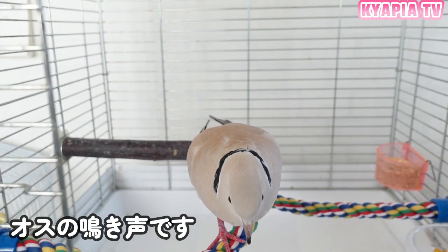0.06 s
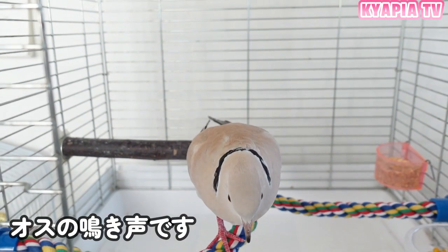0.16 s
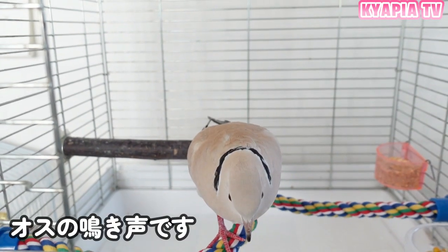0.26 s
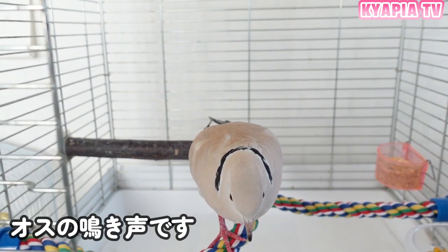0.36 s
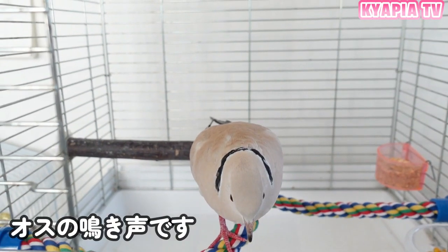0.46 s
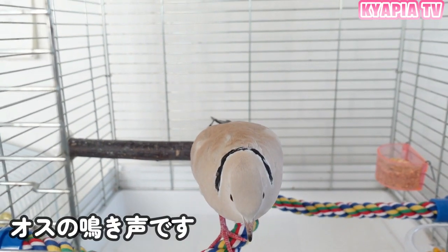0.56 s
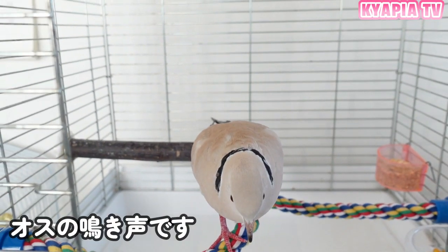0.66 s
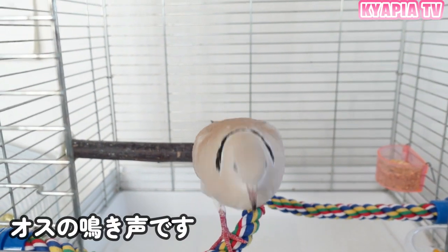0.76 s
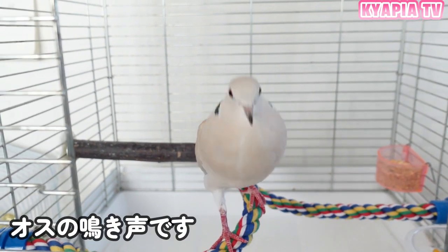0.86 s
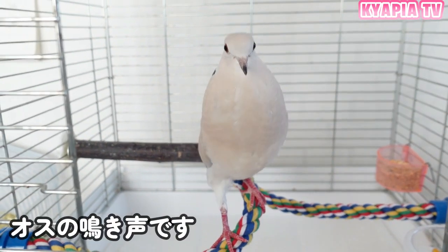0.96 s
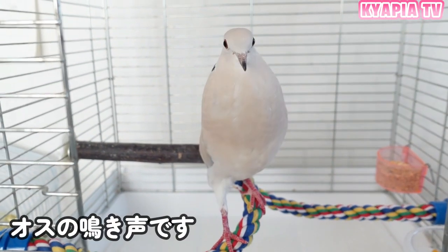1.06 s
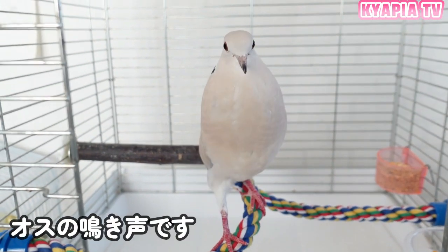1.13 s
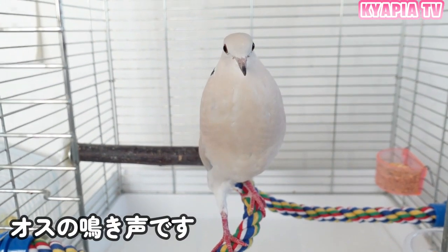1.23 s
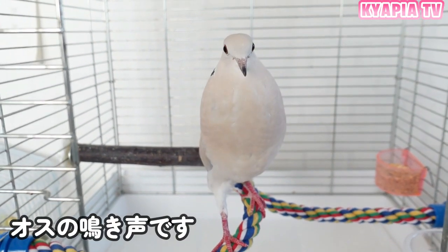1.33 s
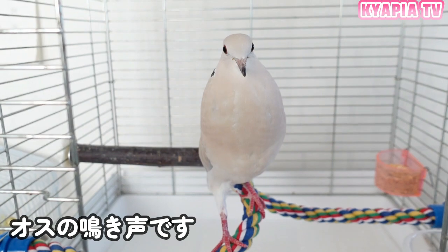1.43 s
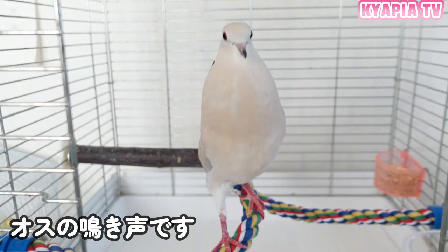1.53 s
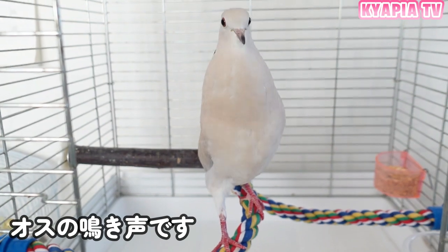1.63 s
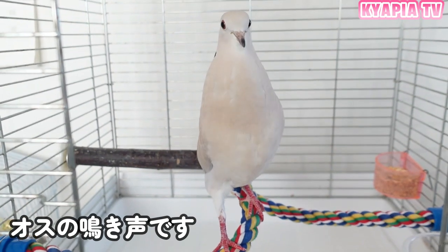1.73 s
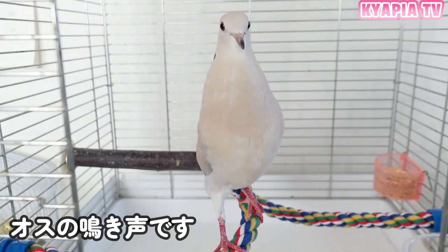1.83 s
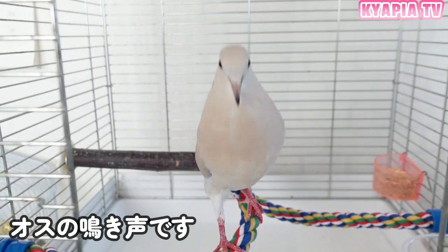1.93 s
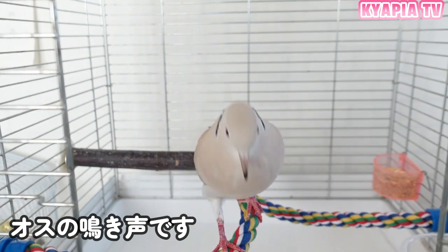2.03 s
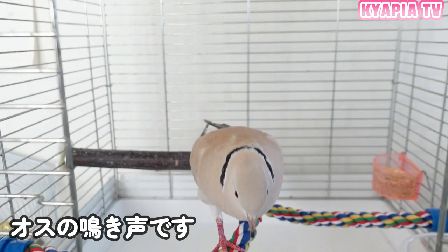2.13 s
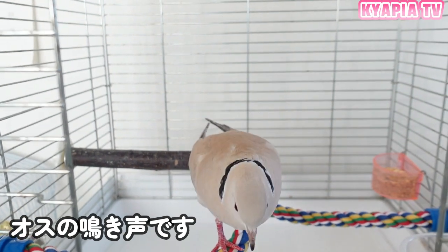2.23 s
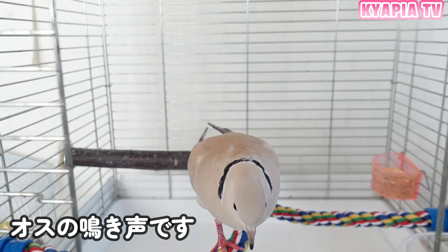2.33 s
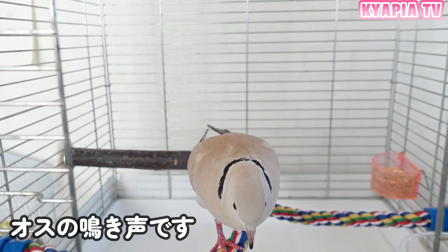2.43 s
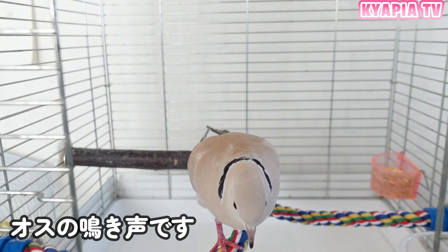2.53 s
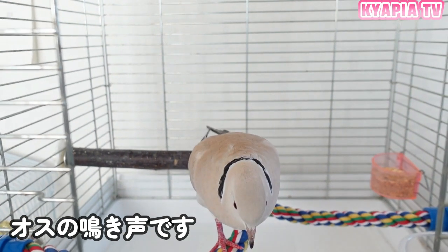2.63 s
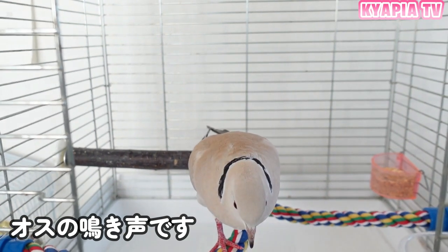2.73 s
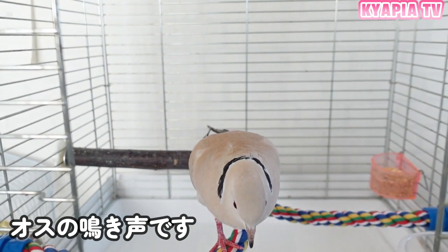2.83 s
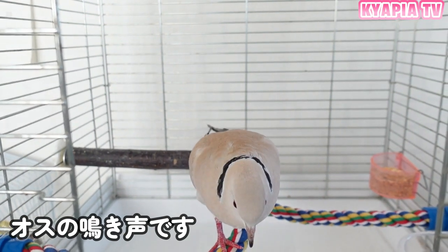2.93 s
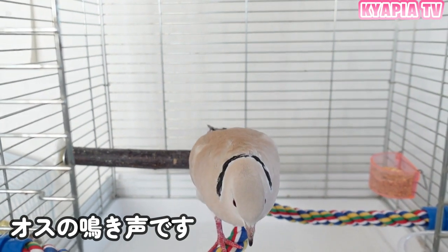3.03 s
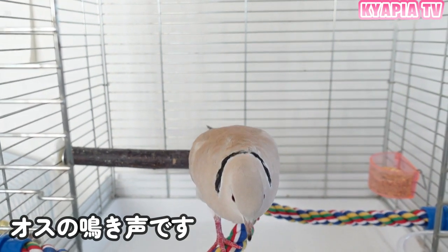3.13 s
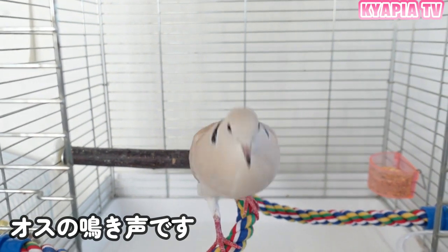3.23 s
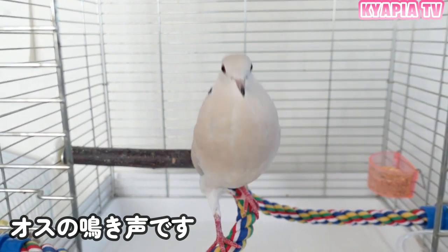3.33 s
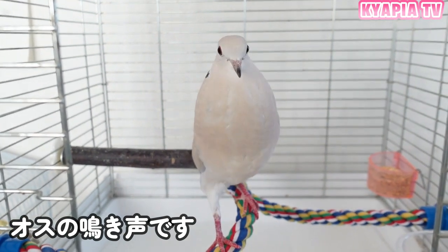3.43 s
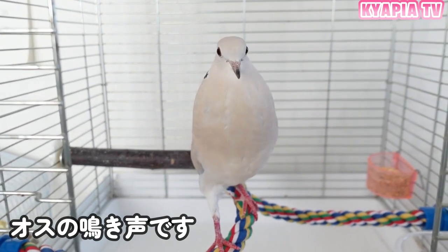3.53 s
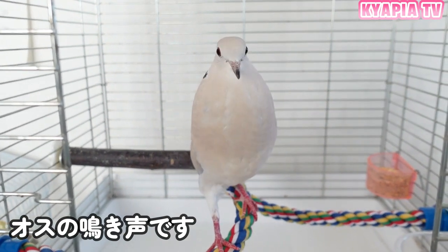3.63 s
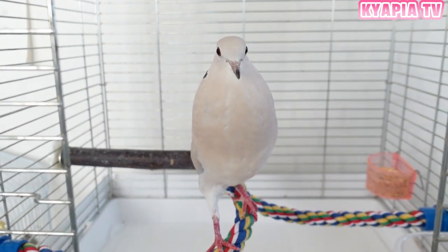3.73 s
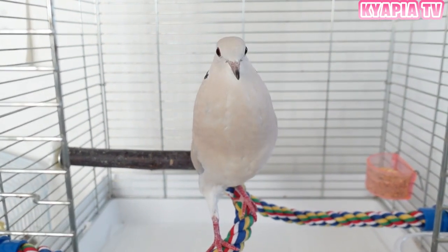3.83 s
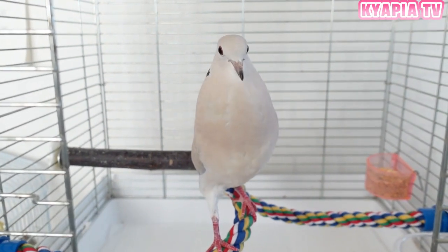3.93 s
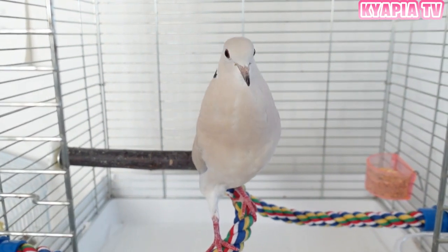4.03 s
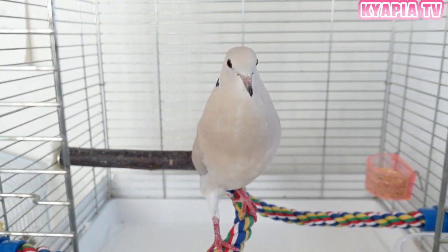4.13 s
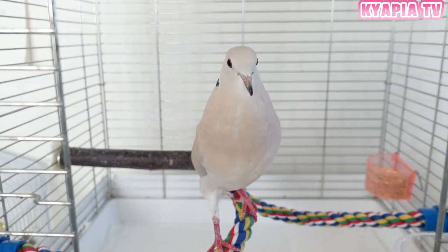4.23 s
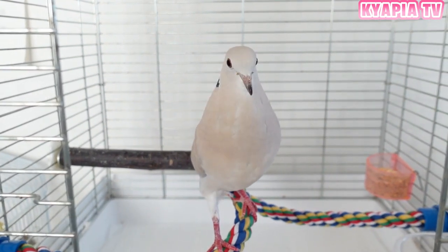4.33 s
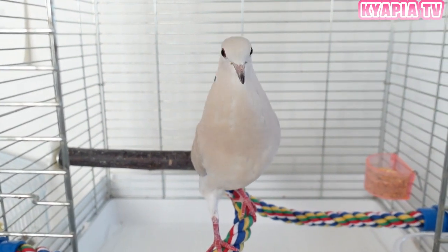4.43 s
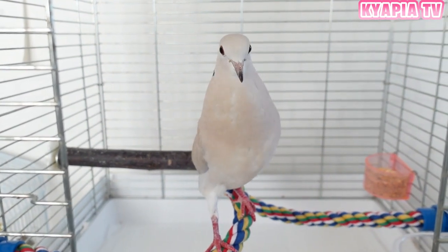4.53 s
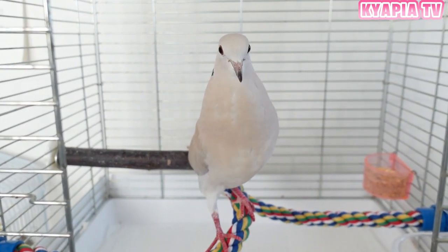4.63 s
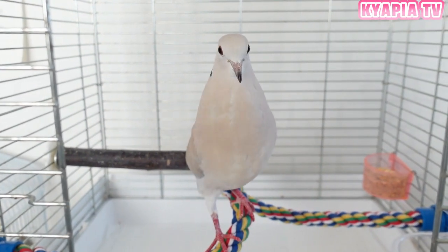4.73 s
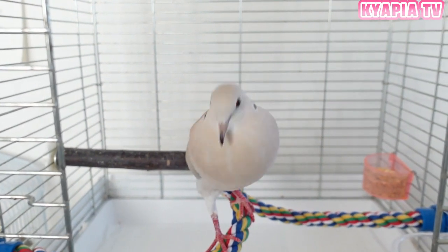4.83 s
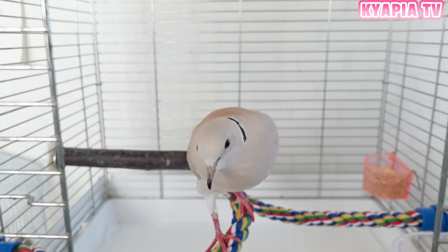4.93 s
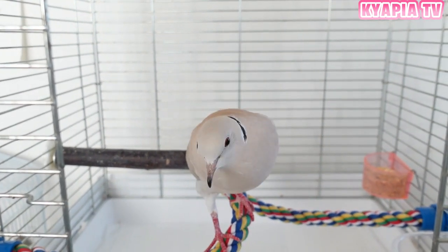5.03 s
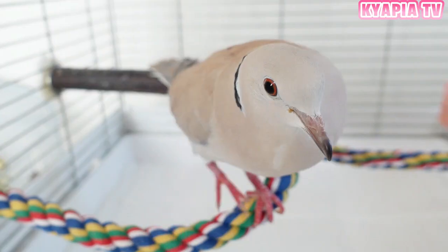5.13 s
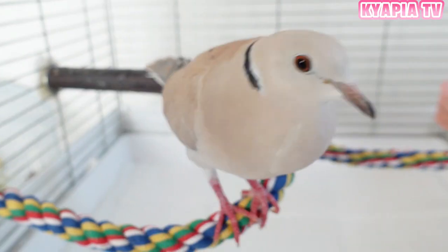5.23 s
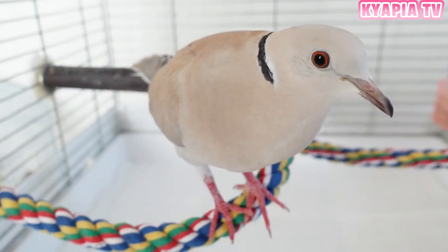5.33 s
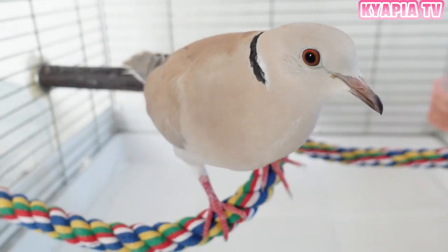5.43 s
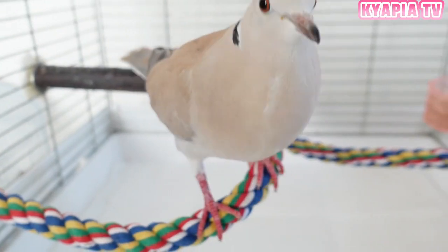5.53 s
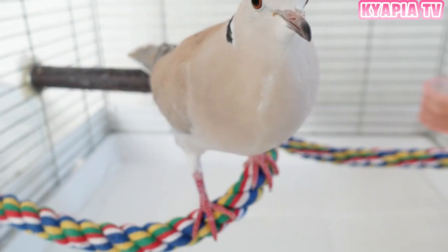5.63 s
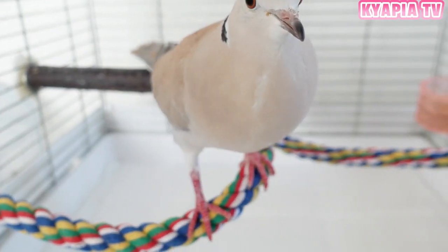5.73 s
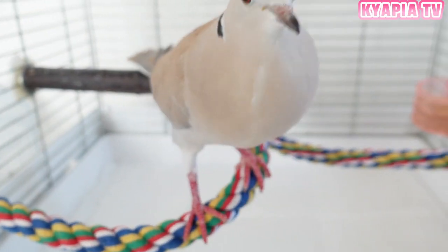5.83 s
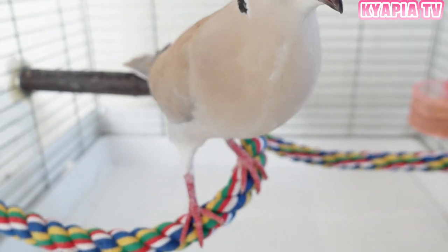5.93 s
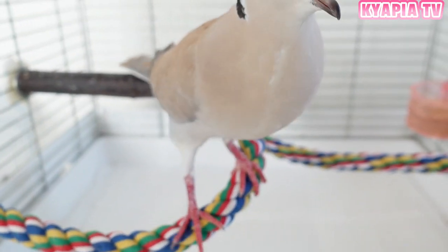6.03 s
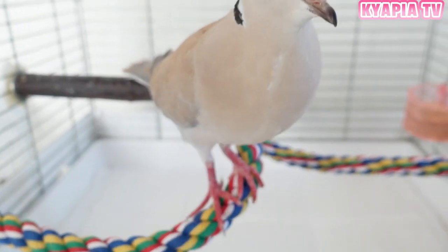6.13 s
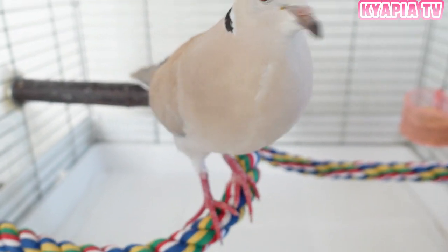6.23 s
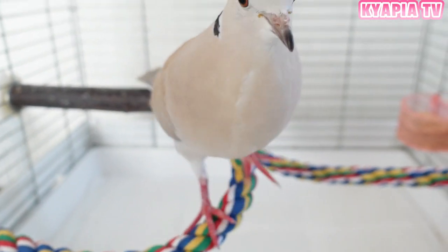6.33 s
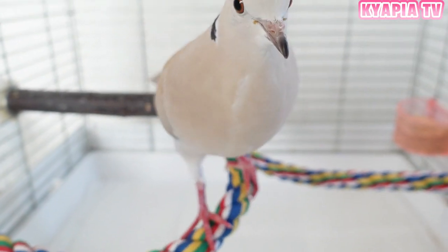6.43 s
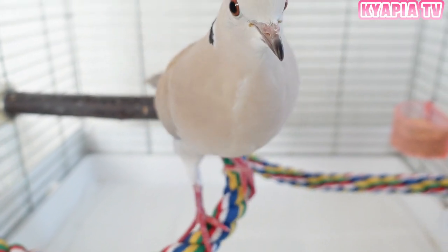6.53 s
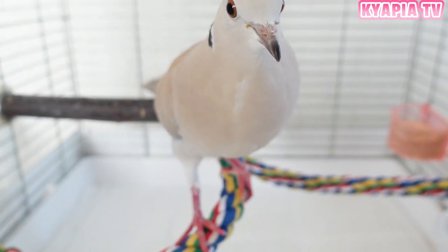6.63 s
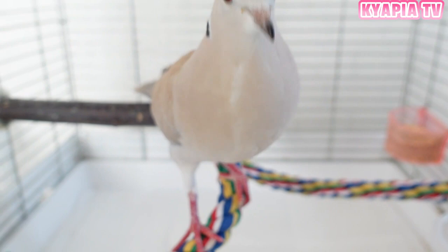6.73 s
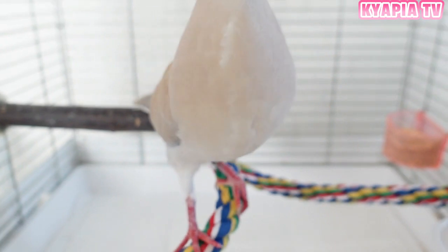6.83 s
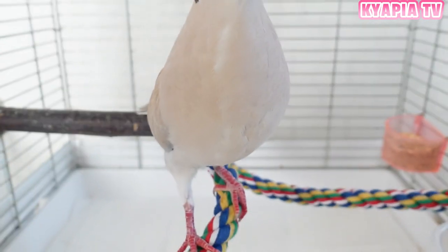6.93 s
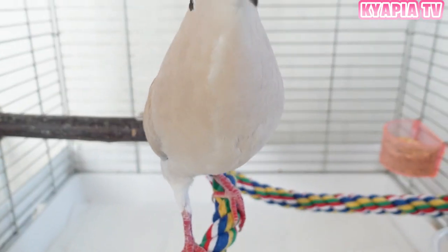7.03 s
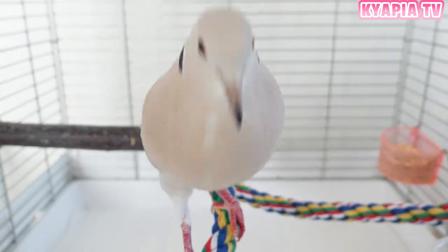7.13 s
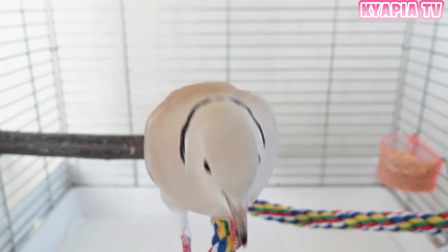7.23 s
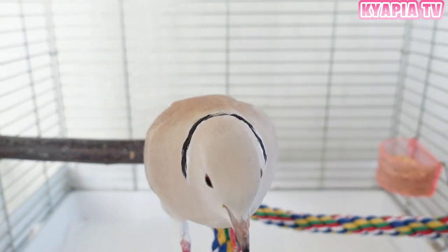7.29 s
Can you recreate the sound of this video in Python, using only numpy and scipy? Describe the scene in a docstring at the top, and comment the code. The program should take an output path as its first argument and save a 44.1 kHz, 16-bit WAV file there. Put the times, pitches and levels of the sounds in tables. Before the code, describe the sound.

Close microphone on a caged dove, with small finches across the room. Mellow, almost pure coos with chopped purring trills fill the first half, interrupted by a pause and one short coo. Wings brush the air briefly, finches buzz and whistle, then their chatter thickens around the dove's bright hiccuping laugh and closing throaty growl. Faint room hiss changes level throughout.

```python
"""A room with a dove close by and small finches across from it, under a faint hiss of changing level.
The dove gives two long coos with rolling trills and a short coo between (chopped near-pure tones),
growls low (pulses ringing a throat) and laughs nasally (bright harmonic stacks that drop in gulps).
The finches answer with buzzy beeps (harmonics and breath), rasps (banded noise), whistles and falling
chirps (wavering sines), all smeared by the room. Ticks and a wing-like rush are ringing sines and noise."""
import sys
import numpy as np
from scipy import signal
from scipy.io import wavfile
from scipy.ndimage import uniform_filter1d

SR = 44100
rng = np.random.default_rng(int(sys.argv[2]) if len(sys.argv) > 2 else 0)


def attenuation_scalar(level_db):
    """Turn a level in dB into a linear amplitude multiplier (20 dB per decade)."""
    decades = np.asarray(level_db, float) / 20
    return 10 ** decades


def inscribe(sig):
    """Save sig as 16-bit PCM at rate SR to the path in sys.argv[1].

    A 1-D sig is mono; a 2-D sig holds one channel per row.
    Samples are clipped to [-1, 1] before scaling.
    """
    pcm = np.round(np.clip(np.atleast_2d(sig).T, -1, 1) * 32767)
    wavfile.write(sys.argv[1], SR, pcm.astype(np.int16))


N = 324576


def read(points, hz):
    """A spectrum at the given frequencies, straight on a log axis."""
    f, value = np.transpose(points)
    return np.interp(np.log(hz + 1), np.log(f + 1), value)


def evened(x):
    """Scales to rms 1."""
    return x / np.sqrt(np.mean(x ** 2) + 1e-20)


def columns(rows):
    """Sample times and sampled columns of a curve table."""
    s, *values = np.transpose(rows)
    t = np.arange(round(s[0] * SR), round(s[-1] * SR)) / SR
    return t, *(np.interp(t, s, v) for v in values)


def add(mix, t, sound, fade_s):
    """Mixes a sound in with soft ends."""
    edge = np.clip(np.minimum(t - t[0], t[-1] - t) / fade_s, 0, 1)
    part = mix[round(t[0] * SR):][:len(t)]
    part += (sound * edge)[:len(part)]


def wobble(size, smooth):
    """Smooth random drift of rms 1; smooth is the averaging length in samples."""
    once = uniform_filter1d(rng.standard_normal(size), int(smooth))
    return evened(uniform_filter1d(once, int(smooth)))


def stack(hz, gain_db, count):
    """Harmonics of a pitch curve, each weighted by gain_db(frequency)."""
    k = np.arange(1, count + 1)[:, None]
    gain = attenuation_scalar(gain_db(k * hz)) * (k * hz < SR / 2.5)
    angle = 2 * np.pi * k * np.cumsum(hz) / SR + k ** 2
    return (gain * np.cos(angle)).sum(0)


def coloured(size, gain_db):
    """Noise from random short-time spectra; gain_db(s, Hz) sets the magnitudes."""
    frames, hz = size // 64 + 5, np.fft.rfftfreq(256, 1 / SR)[:, None]
    a, b = rng.standard_normal((frames, 129, 2)).T
    z = (a + 1j * b) * attenuation_scalar(gain_db(np.arange(frames) * 64 / SR, hz))
    return evened(signal.istft(z, nperseg=256, noverlap=192)[1][:size])


def call(start, length, db, shape):
    """Sample times, progress 0-1 and level of a call that rises to its peak and falls away."""
    t = np.arange(round(start * SR), round((start + length) * SR)) / SR
    u, (peak, start_db, end_db) = (t - start) / length, shape
    return t, u, db + np.interp(u, [0, np.clip(peak, .02, .9), 1], [start_db, 0, end_db])


def beak(f, centre_hz):
    """Colour of a beak in dB: one movable resonance, and a slope down above it."""
    # fixed colour of the finch voice: (frequency [Hz], gain [dB])
    finch_colour = [(400, -78), (1000, -14), (2000, -5), (3500, -2.5), (6000, 4.5), (7000, 1), (9000, -8.5),
                    (16000, -22)]
    width_hz, peak_db = 1100, 8.
    above_khz = np.clip(f - centre_hz, 0, 4000) / 1000
    resonance_db = peak_db * np.exp(-((f - centre_hz) / width_hz) ** 2)
    return read(finch_colour, f) + resonance_db - 2.92 * above_khz


def hiss():
    """Room noise with slight patches and a level that changes over time, partly alike at the two ears."""
    # noise colour: (frequency [Hz], relative density [dB per Hz])
    hiss_colour = [(15, -54), (25, -90), (141, -8), (342, -4.5), (604, 3.5), (834, 4.5), (1280, -0.5),
                   (2460, -0.5), (2730, -2), (4100, -2.5), (6490, -8.5), (10500, -9), (15800, -15.5)]
    # hiss level over time, relative to the base: (time [s], level [dB])
    hiss_course = [(0, 6), (4.3, 5), (4.6, 5), (5.1, 1), (5.9, -6), (7.36, 2.5)]
    # left-right likeness: (frequency [Hz], correlation [0-1])
    likeness = [(30, .995), (200, 1), (1000, 0.83), (4000, 0.6), (12000, 0.68)]
    base_db = -51  # before the course
    frames, hz = N // 256 + 5, np.fft.rfftfreq(1024, 1 / SR)
    a, b, c, d, patches = rng.standard_normal((frames, 513, 5)).T
    patches = evened(uniform_filter1d(uniform_filter1d(patches, 12, 0), 14, 1))
    same = np.clip(read(likeness, hz), -1, 1)[:, None]
    left = a + 1j * b
    right = same * left + np.sqrt(1 - same ** 2) * (c + 1j * d)
    z = np.array([left, right]) * attenuation_scalar(read(hiss_colour, hz)[:, None] + 3 * patches)
    noise = evened(signal.istft(z, nperseg=1024, noverlap=768)[1][:, :N])
    course_db = np.interp(np.arange(N) / SR, *np.transpose(hiss_course))
    return attenuation_scalar(base_db + course_db) * noise


def piped(curves, waver, flutter_db):
    """Wavering sines with faint overtones, along curves of time, pitch and level."""
    out = np.zeros(N)
    for t, hz, db in curves:
        angle = 2 * np.pi * np.cumsum(hz * (1 + waver * wobble(len(t), 60))) / SR
        burr = 1 + 0.33 * wobble(len(t), 22)  # fast unevenness spreads a rough skirt round the line
        tone = burr * np.sin(angle) + attenuation_scalar(-30.0) * np.sin(2 * angle) + attenuation_scalar(-43.0) * np.sin(3 * angle)
        level_db = db + flutter_db * wobble(len(t), 150)
        add(out, t, np.sqrt(2) * attenuation_scalar(level_db) * tone, .004)
    return out


def whistles():
    """Finch whistles: straight pitch glides under a common envelope."""
    # (start [s], length [s], level before the mix [dB], start pitch [Hz], end pitch [Hz])
    whistle_calls = [(0.052, 0.044, -30, 4200, 4080), (0.06, 0.026, -37.5, 1898, 1846),
                     (.783, 0.042, -30.5, 4220, 4080), (0.795, 0.031, -39, 1870, 1750),
                     (1.438, .05, -56.5, 5820, 5840), (2.173, 0.086, -57, 6780, 6650),
                     (2.382, 0.076, -52, 2070, 2080), (3.33, 0.026, -53, 5450, 5630),
                     (3.547, 0.066, -42.5, 4300, 4150), (3.886, 0.067, -42.5, 4460, 4490),
                     (3.899, 0.044, -42.5, 5910, 5850), (4.083, 0.033, -32.5, 7150, 7000),
                     (4.09, 0.17, -39, 936, 938), (4.467, .13, -49.5, 944, 1025),
                     (5.281, 0.036, -28.5, 4280, 4240), (5.361, 0.029, -30, 5400, 5140),
                     (5.391, 0.034, -30, 3397, 3240), (5.456, 0.027, -31.5, 4260, 4450),
                     (5.533, 0.026, -30, 6430, 5620), (5.563, 0.15, -46.5, 1936, 1715),
                     (5.608, .035, -32, 3940, 4000), (5.692, 0.044, -27, 5640, 5640),
                     (5.705, .07, -23, 4324, 4406), (5.726, 0.039, -27.5, 5306, 3440),
                     (6.099, 0.033, -26, 6250, 5770), (6.086, 0.052, -30.5, 4330, 4384),
                     (6.238, 0.041, -23.5, 4276, 4100), (6.562, 0.026, -29, 6180, 6200),
                     (6.625, 0.036, -29, 6080, 6190), (6.668, .04, -32.5, 3310, 3170),
                     (6.8, 0.051, -27, 4170, 4030), (6.798, 0.034, -31, 6570, 5830),
                     (6.98, 0.19, -35.5, 5980, 5305), (7.033, 0.032, -26.5, 4236, 4340),
                     (7.22, 0.034, -27, 4390, 4230)]
    # envelope: (peak place [0-1], start level [dB], end level [dB])
    whistle_shape = (.2, -5, -6)
    curves = []
    for start, length, db, start_hz, end_hz in whistle_calls:
        t, u, db = call(start, length, db, whistle_shape)
        curves.append((t, start_hz + (end_hz - start_hz) * u, db))
    return piped(curves, waver=0.0095, flutter_db=2.5)


def chirps():
    """Falling finch chirps: one downward sweep with a steep knee, stretched in time."""
    # (time of the knee [s], level before the mix [dB], stretch of the sweep [factor])
    chirp_calls = [(.158, -23.5, 0.98), (.89, -23.5, 0.98), (6.396, -21.5, 1.4), (6.921, -20.5, 0.96)]
    # shared sweep: (time from the knee before stretching [s], pitch [Hz], level [dB])
    sweep = [(-.038, 6020, -17), (-.018, 5280, -7), (0, 4690, -1), (.008, 3230, -8), (0.022, 3100, -7)]
    curves = [columns([(s + at * slow, hz, db + d) for at, hz, d in sweep]) for s, db, slow in chirp_calls]
    return piped(curves, waver=0.0292, flutter_db=2.0)


def coo():
    """A nearly pure tone from the swollen crop, chopped by the closing syrinx."""
    # one curve a syllable (roll, hoo, short coo, roll, hoo, drop): (time [s], pitch [Hz], level [dB]),
    # before the trill bends and chops it; the level includes swells from crop resonance or room
    syllables = [
        [(.145, 480, -39), (.245, 463, -29.5), (.295, 554.5, -22), (.4, 588.8, -22.5), (.6, 603.2, -25),
         (.74, 599, -23.5), (.8, 606, -23), (.825, 629.7, -28), (.849, 576, -19), (.89, 650, -30),
         (.915, 648, -25), (1.021, 645, -24.5), (1.04, 630, -23)],
        [(1.042, 632, -47), (1.058, 639, -22), (1.094, 510.6, -15), (1.112, 454.4, -24), (1.15, 543.4, -16),
         (1.168, 602, -19.5), (1.218, 595.3, -16), (1.266, 581, -20.5), (1.31, 571.6, -17.5), (1.326, 595, -24),
         (1.352, 521, -14.5), (1.364, 555, -32), (1.41, 476, -40.5)],
        [(2.132, 443, -30.5), (2.154, 610, -23), (2.165, 657, -29), (2.186, 658, -30), (2.204, 643, -37),
         (2.252, 663, -24), (2.32, 626, -29.5), (2.335, 590, -51)],
        [(2.5, 480, -38.5), (2.54, 461.5, -38.5), (2.58, 491, -29.5), (2.63, 544.3, -22.5), (2.747, 594.5, -22),
         (2.9, 608.3, -26), (3.02, 615, -21), (3.12, 596.2, -23.5), (3.155, 619, -23.5), (3.176, 585.5, -20),
         (3.216, 654, -27), (3.23, 653, -29), (3.256, 649, -32)],
        [(3.256, 634, -23), (3.296, 528.5, -17.5), (3.32, 558.5, -15), (3.345, 634, -25.5), (3.379, 613, -22),
         (3.403, 628, -27.5), (3.533, 622, -18.5), (3.556, 601, -25.5), (3.575, 617, -19.5),
         (3.615, 521, -14.5), (3.627, 468, -30), (3.651, 550, -28)],
        [(3.66, 492, -49), (3.697, 453.6, -23.5), (3.725, 493, -24), (3.757, 484, -22.5), (3.766, 443, -36.5),
         (3.789, 464, -25), (3.828, 523, -52)],
    ]
    # moments when the syrinx reopens: time [s]
    reopenings = [.188, .226, 0.264, 0.297, .333, 0.365, 0.397, .432, 0.465, .5, .541, 0.582, 0.626, .673,
                  0.73, 0.809, 2.548, 2.587, 2.627, 2.659, 2.689, 2.725, 2.756, 2.793, 2.83, 2.869, 2.913,
                  2.957, 3.011, 3.069, 3.143]
    # overtones of the closed beak: (multiple of the pitch, level [dB])
    closed_beak = [(1, 4.5), (2, -35.5), (3, -34)]
    closure_db = 22.  # depth in loud pulses
    reopen_lift, sag_s = .1, .022  # pitch sags from half this share sharp towards half this share flat
    closing_drop = .02  # share of pitch lost as the syrinx closes
    trachea_hz, trachea_db = 1284, 16  # a windpipe resonance lifts the octave of high notes
    out = np.zeros(N)
    for rows in syllables:
        t, hz, db = columns(rows)
        gate, sharp = np.ones(len(t)), np.zeros(len(t))
        depth_db = closure_db * np.clip((db + 39.5) / 22.0, .3, 1)  # soft pulses close less
        for at in reopenings:
            # slow closing, quick reopening
            shut = np.interp(t - at, [-0.0187, -0.0094, -0.0034, 0.0005], [0.013, 1.0, 1, 0.018])
            gate *= 1 - shut * (1 - attenuation_scalar(-depth_db))
            sag = np.exp(-np.clip(t - at, 0, None) / sag_s) - .5
            sharp += reopen_lift * sag * (t > at) * (t < at + .045) - closing_drop * shut
        gate = uniform_filter1d(gate, 90)
        turns = np.cumsum(hz * (1 + sharp + 0.0073 * wobble(len(t), 226))) / SR
        tone = np.zeros(len(t))
        for k, order_db in closed_beak:
            windpipe_db = trachea_db * np.exp(-((k * hz - trachea_hz) / 47.0) ** 2)
            tone += attenuation_scalar(order_db + windpipe_db) * np.sin(2 * np.pi * k * turns)
        add(out, t, np.sqrt(2) * attenuation_scalar(db) * gate * tone, .004)
    return out


def beeps():
    """Buzzy finch harmonic stacks with a little breath, coloured by the beak."""
    # (start [s], length [s], effort before the mix [dB], top pitch [Hz], end pitch [Hz])
    beep_calls = [(0.221, 0.24, -28, 664.5, 629), (0.608, 0.035, -43.5, 623, 583),
                  (1.067, 0.09, -39.5, 487.5, 476), (1.63, 0.051, -46.5, 513, 505),
                  (1.866, 0.1, -40, 572, 518), (2.734, 0.084, -29, 636, 565),
                  (2.994, 0.058, -32.5, 539.7, 509), (3.121, 0.059, -32, 536, 499),
                  (3.412, 0.091, -37.5, 591, 542), (3.852, 0.053, -40, 508.5, 515),
                  (4.27, 0.051, -41.5, 506, 512), (4.358, 0.108, -40.5, 498, 475),
                  (4.612, 0.1, -38.5, 582, 562), (4.691, .055, -33.5, 564.5, 508),
                  (4.793, 0.084, -35, 643, 581), (5.17, 0.15, -30, 555, 522),
                  (6.479, 0.15, -25.5, 706, 700)]
    # envelope: (peak place [0-1], start level [dB], end level [dB])
    beep_shape = (0.31, -2.5, -4)
    scoop, breath = 0.93, .12  # pitch factor at the start; breath share of the power
    soft_hz, hz_per_db, soft_db = 2720, 140, -36.5  # more effort opens the beak wider
    out = np.zeros(N)
    for start, length, db, top_hz, end_hz in beep_calls:
        centre_hz = soft_hz + hz_per_db * max(db - soft_db, 0)
        t, u, db = call(start, length, db, beep_shape)
        hz = np.interp(u, [0, .12, .6, 1], [scoop * top_hz, top_hz, top_hz, end_hz])
        hz = hz * (1 + 0.0062 * wobble(len(t), 126))
        thin_db = .002  # per Hz above the beak resonance: pure voicing has less treble
        ripple_db = 2.5 * rng.standard_normal((30, 1))  # each call favours its own harmonics

        def voice_db(f):
            return beak(f, centre_hz) + ripple_db - thin_db * np.clip(f - centre_hz, 0, None)

        tone = evened(stack(hz, voice_db, count=30))
        puff = coloured(len(t), lambda s, f: beak(f, centre_hz) + 0 * s)
        add(out, t, attenuation_scalar(db) * (np.sqrt(1 - breath) * tone + np.sqrt(breath) * puff), .014)
    return out


def rasps():
    """Chaotic finch voicing: noise in uneven bands that come and go."""
    # (start [s], length [s], level before the mix [dB], beak resonance [Hz], treble level [dB])
    rasp_calls = [(1.007, 0.11, -42.5, 3230, -24), (1.162, 0.069, -28.5, 3270, -22),
                  (1.298, 0.056, -37.5, 3440, -35), (1.503, 0.12, -38, 2980, -17),
                  (1.766, 0.22, -46, 2680, -11), (1.928, 0.076, -45, 3040, -2),
                  (2.339, 0.13, -47.5, 3320, -24), (2.87, 0.076, -37, 2950, -14),
                  (3.399, 0.049, -46.5, 2500, 4), (3.606, 0.06, -32.5, 3200, -18),
                  (4.454, 0.044, -43.5, 3830, -18), (4.53, 0.039, -53, 3000, -20),
                  (5.13, 0.12, -33.5, 4350, -16.5), (5.294, .06, -30, 3600, -44),
                  (5.38, 0.039, -33, 3300, -42), (5.499, 0.11, -31, 4500, -33),
                  (5.564, 0.086, -26, 3930, -13), (5.726, 0.053, -27, 3820, -14),
                  (5.855, 0.077, -27.5, 3970, -24), (5.977, 0.052, -26.5, 2820, -20),
                  (6.049, 0.12, -25, 3720, -16.5), (6.182, 0.073, -29.5, 3460, -21),
                  (6.427, 0.083, -26.5, 4200, -17), (6.599, 0.093, -24, 4000, -17),
                  (6.835, 0.074, -24, 4070, -15), (7.136, 0.084, -27, 3650, -47),
                  (7.259, 0.12, -21.5, 3900, -23.5)]
    # envelope: (peak place [0-1], start level [dB], end level [dB])
    rasp_shape = (0.31, -5.5, -4)
    out = np.zeros(N)
    for start, length, db, centre_hz, treble_db in rasp_calls:
        t, u, db = call(start, length, db, rasp_shape)
        patches = uniform_filter1d(rng.standard_normal((len(t) // 64 + 5, 129)).T, 14, 1)
        bands_db = 5. * evened(uniform_filter1d(patches, 3, 0))

        def fizz_db(s, f):
            slope_db = -17.5 * np.log2(f / 8000 + 0.00053) * (f > 7500)
            return -40. * (f < 7500) + slope_db + bands_db

        body = coloured(len(t), lambda s, f: beak(f, centre_hz) + bands_db)
        fizz = coloured(len(t), fizz_db)
        add(out, t, attenuation_scalar(db) * (body + attenuation_scalar(treble_db) * fizz), .012)
    return out


def ticks():
    """Claws on the perch: three sines that die together in a few ms."""
    # (time [s], level before the mix [dB])
    claw_ticks = [(1.052, -27), (5.82, -29), (5.867, -27)]
    out = np.zeros(N)
    u = np.arange(400) / SR
    ring = np.sin(2 * np.pi * 1200 * u) + 0.84 * np.sin(2 * np.pi * 2300 * u)
    ring += 0.24 * np.sin(2 * np.pi * 520 * u)
    for at, db in claw_ticks:
        add(out, at + u, attenuation_scalar(db) * np.exp(-u / 0.0014) * ring, .0002)
    return out


def growl():
    """Slow uneven pulses ring the dove's throat."""
    # (start [s], length [s], basic pulse rate [Hz], level [dB], throat size [factor on its resonances])
    growl_calls = [(3.83, 0.11, 141.3, -44, 0.51), (7.155, .22, 149.9, -35.5, 0.95)]
    # throat resonances: (frequency before the size factor [Hz], width [Hz], relative level [dB])
    throat = [(400, 190, -38), (876, 160, 28), (1177, 117, 38.5), (2160, 950, 22), (3120, 590, 10)]
    no_bass = signal.butter(4, 260., "high", fs=SR, output="sos")  # the small body cannot radiate the pulse rate
    out = np.zeros(N)
    for start, length, rate, db, size in growl_calls:
        t, u, db = call(start, length, db, (.15, -2.5, -.3))
        rate = rate * (1 + .07 * np.sin(np.pi * u ** .6) - 0.03 * u)  # the rate arches
        turns = np.cumsum(rate * (1 + 0.035 * wobble(len(t), 200))) / SR
        pulses = np.diff(np.floor(turns), prepend=0)
        pulses *= attenuation_scalar(0.84 * rng.standard_normal(len(t)))
        s = t - t[0]
        ring = sum(attenuation_scalar(d) * np.exp(-np.pi * w * s) * np.sin(2 * np.pi * f * size * s) for f, w, d in throat)
        voice = signal.sosfilt(no_bass, signal.fftconvolve(pulses, ring)[:len(t)])
        add(out, t, attenuation_scalar(db) * evened(voice), .01)
    return out


def rush():
    """Broad air noise in a few strokes, like wings close by."""
    # (start [s], length [s], level before the mix [dB], tilt [dB per octave])
    strokes = [(4.082, 0.15, -23.5, 7.5), (4.15, 0.15, -24, 4), (4.297, 0.15, -35, 4.5)]
    # air colour before the tilt: (frequency [Hz], relative density [dB per Hz])
    air_colour = [(120, -62), (200, -53), (490, 8), (746, -4), (929, 9.5), (1580, 2), (1790, -1),
                  (2780, -1), (15800, -19.5)]
    # envelope: (peak place [0-1], start level [dB], end level [dB])
    stroke_shape = (0.16, -1.5, -21.5)
    out = np.zeros(N)
    for start, length, db, tilt_db in strokes:
        t, u, db = call(start, length, db, stroke_shape)
        air = coloured(len(t), lambda s, f: read(air_colour, f) + tilt_db * np.log2((f + 1) / 3000) + 0 * s)
        grain_db = 2.3 * wobble(len(t), 60)  # feathers rustle unevenly
        add(out, t, attenuation_scalar(db + grain_db) * air, .006)
    return out


def note(start, length, low_hz, top_hz, db):
    """A laugh note: pitch and level climb together, then the pitch droops a little."""
    climb_s, climb_db, droop_per_s = .062, -10, 0.14  # every note climbs for the same time
    start_lift_db = 5  # while the fundamental is still weak the overtones stand out
    t = np.arange(round(start * SR), round((start + length) * SR)) / SR
    left = np.clip(1 - (t - start) / climb_s, 0, 1) ** 1.8
    droop_hz = top_hz * droop_per_s * np.clip(t - start - climb_s, 0, None)
    hz = top_hz - (top_hz - low_hz) * left - droop_hz
    return t, hz, db + climb_db * left, start_lift_db * left


def laugh():
    """Open-beak dove notes: a clean nasal stack that arches up, breaks, and drops in a short gulp."""
    # (start [s], length [s], first pitch [Hz], top pitch [Hz], level [dB])
    laugh_notes = [(5.942, 0.041, 374, 632, -25), (6.048, 0.12, 400, 685, -22.5),
                   (6.25, 0.12, 452.5, 682, -21.5), (6.465, 0.14, 465.6, 652.5, -21),
                   (6.706, 0.133, 505.3, 602, -22), (6.952, .135, 458, 527, -26)]
    # gulps after the notes: (start [s], pitch [Hz], level [dB])
    gulp_calls = [(5.996, 606, -22), (6.176, 586, -23), (6.389, 584, -24.5), (6.618, 616, -21),
                  (6.855, 573, -22), (7.105, 537, -28)]
    # course of a gulp: (time after its start [s], pitch [factor], level [dB], overtone lift [dB])
    gulp_course = [(0, 1.06, -8, 2.5), (.005, 1.01, 1, 2.5), (.017, .83, -11, 1.5),
                   (0.038, 0.58, -23, 12.5)]
    # nasal colour, taken relative to the fundamental: (frequency [Hz], gain [dB])
    nose_colour = [(400, 3), (700, 1), (1100, -16), (1500, -9.5), (2050, -5.), (2700, -6.5), (3500, -6.5),
                   (4200, -12.5), (4800, -14.5), (6000, -19), (7000, -29.5), (10000, -30), (15000, -42.5)]
    breath_db = -12.
    out = np.zeros(N)
    notes = [note(*row) for row in laugh_notes]
    for s, hz, db in gulp_calls:
        notes.append(columns([(s + at, k * hz, db + d, lift) for at, k, d, lift in gulp_course]))
    for t, hz, db, bright_db in notes:

        def nose_db(f):
            lift_db = bright_db * np.clip(f / hz - 1, 0, 1)
            return read(nose_colour, f) - read(nose_colour, hz) + lift_db

        tone = np.sqrt(2) * stack(hz * (1 + 0.0094 * wobble(len(t), 109)), nose_db, count=28)
        breath = coloured(len(t), lambda s, f: beak(f, 2500.0) + 0 * s)  # air hisses through the open beak
        add(out, t, attenuation_scalar(db) * (tone + attenuation_scalar(breath_db + bright_db) * breath), .004)
    return out


def room(x, apart):
    """Sparse random taps dying by band; apart = how much the two ears differ."""
    # reverberation time: (frequency [Hz], time to fall by 60 dB [s])
    decay_times = [(300, 0.34), (1000, 0.39), (4000, 0.27), (12000, 0.15)]
    taps = np.zeros((2, SR // 2))
    slots = np.arange(200, SR // 2 - 20, 20)
    at = slots + rng.integers(0, 20, (2, len(slots)))
    np.put_along_axis(taps, at, rng.choice([-1., 1.], at.shape), 1)
    hz, t, z = signal.stft(taps, SR, nperseg=256)
    decay = attenuation_scalar(-60 * t / read(decay_times, hz)[:, None])
    both, other = signal.istft(z * decay, SR, nperseg=256)[1]
    no_bass = signal.butter(1, 1500., "high", fs=SR, output="sos")  # bass is alike at both ears
    spread = apart * signal.sosfilt(no_bass, other)
    tail = np.array([both + spread, both - spread])
    return signal.fftconvolve(x[None], tail / np.linalg.norm(tail[0]), axes=1)[:, :N]


def treble_width(x):
    """A random treble smear of a few ms, opposite at the two ears, for stereo width."""
    taps = rng.standard_normal(300) * np.exp(-np.arange(300) / 130.0)
    smeared = signal.oaconvolve(x, taps / np.linalg.norm(taps))[..., :N]
    treble = signal.butter(2, 3000., "high", fs=SR, output="sos")
    return attenuation_scalar(-8.0) * np.outer([1, -1], signal.sosfilt(treble, smeared))


def scene():
    """The dove is near, central and fairly dry; the finches are far and wet; small birds radiate no bass."""
    # where the finches call from: (time [s], left over right [dB])
    side_course = [(0, -3.5), (1.2, -3), (1.6, 0), (2.602, -3), (3.2, -1.5), (4., 1), (4.5, 1.5), (4.6, -2),
                   (7.36, -2.5)]
    dove = coo() + laugh() + growl()
    voices = beeps() + rasps()
    piping = whistles() + chirps()
    wings = rush() + ticks()
    wet = attenuation_scalar(-2.0) * voices + attenuation_scalar(0.5) * piping + attenuation_scalar(-4.0) * wings
    far = attenuation_scalar(1.0) * voices + attenuation_scalar(2.5) * piping + wings + room(wet, apart=0.41)
    side_db = np.interp(np.arange(N) / SR, *np.transpose(side_course))
    placed = far * attenuation_scalar(np.outer([.5, -.5], side_db))
    birds = dove + attenuation_scalar(-14.5) * room(dove, apart=0.24) + treble_width(far.mean(0) + dove) + placed
    no_bass = signal.butter(3, 230., "high", fs=SR, output="sos")
    return signal.sosfilt(no_bass, birds) + hiss()


def low_pass(x):
    """Removes everything above the highest recorded frequency."""
    return signal.sosfilt(signal.butter(12, 16510, fs=SR, output="sos"), x)


def record(dry):
    """The microphone drops the bass and the very top."""
    low_cut = signal.butter(1, 40., "high", fs=SR, output="sos")
    top_cut = signal.firwin(301, 15900, window=("kaiser", 9), fs=SR)
    heard = signal.oaconvolve(signal.sosfilt(low_cut, dry), top_cut[None], "same")
    return low_pass(heard)


dry = scene()
out = record(dry)
inscribe(out)
```